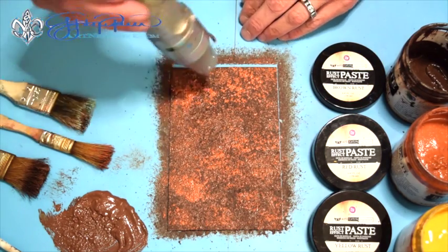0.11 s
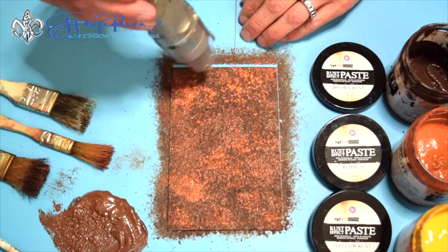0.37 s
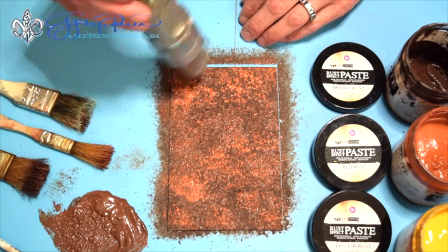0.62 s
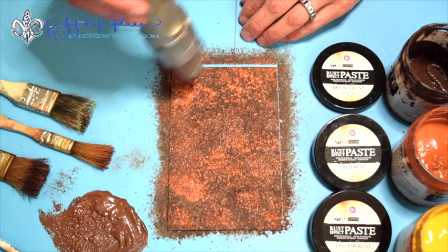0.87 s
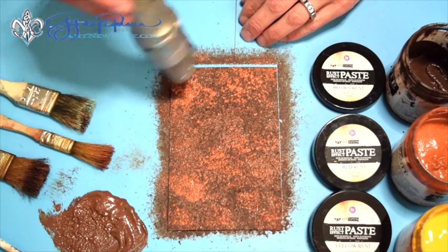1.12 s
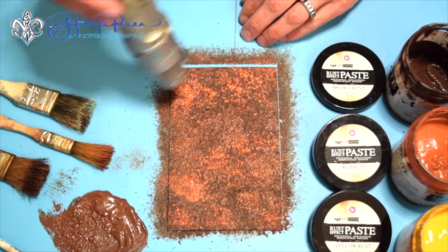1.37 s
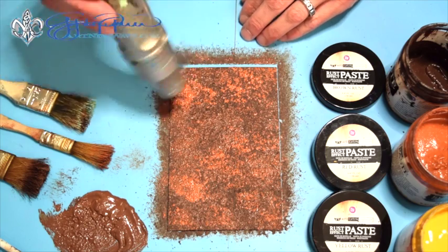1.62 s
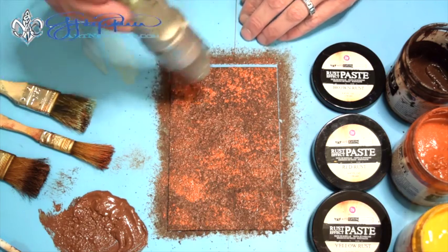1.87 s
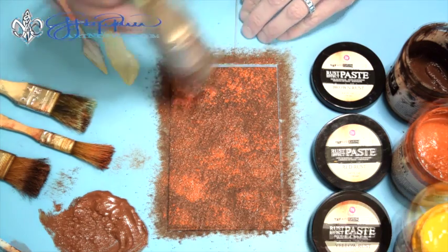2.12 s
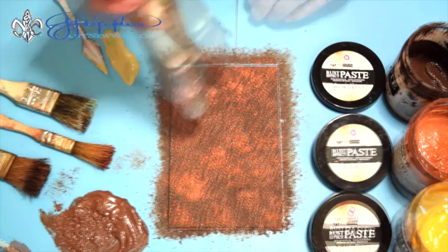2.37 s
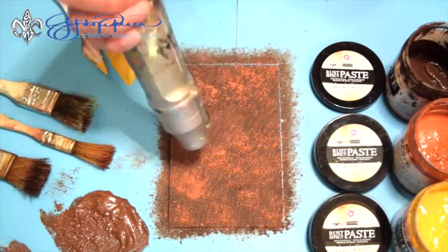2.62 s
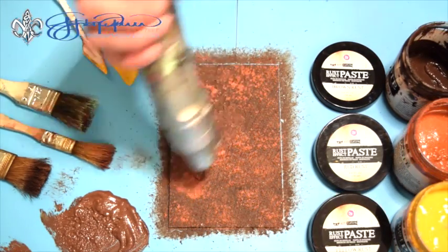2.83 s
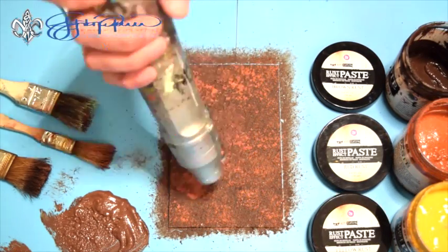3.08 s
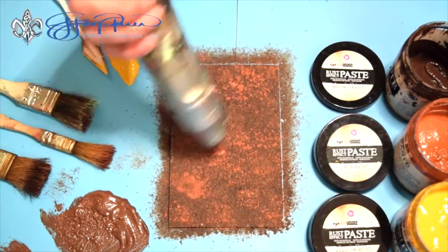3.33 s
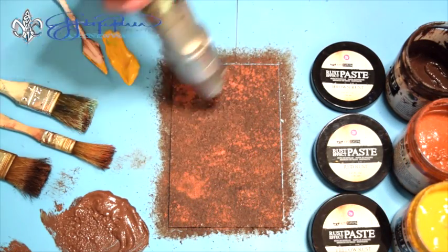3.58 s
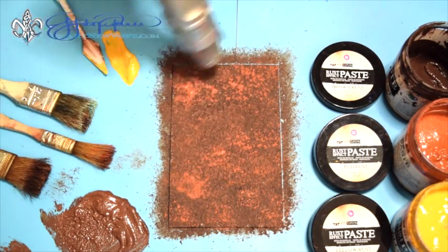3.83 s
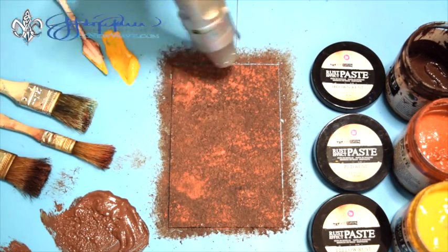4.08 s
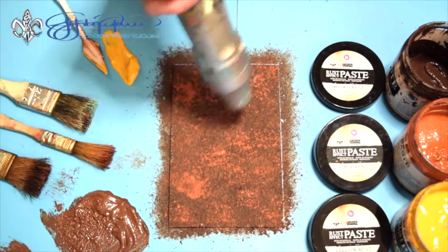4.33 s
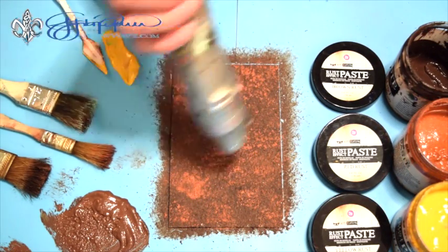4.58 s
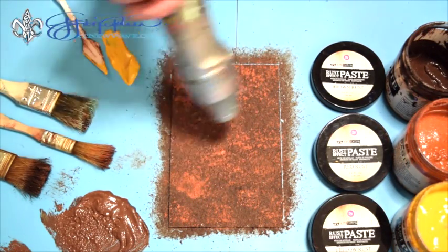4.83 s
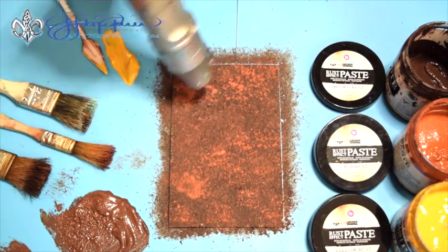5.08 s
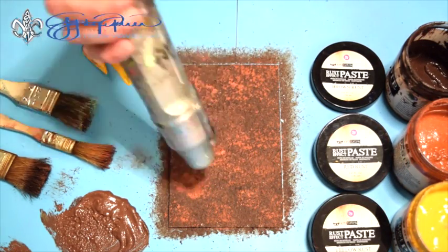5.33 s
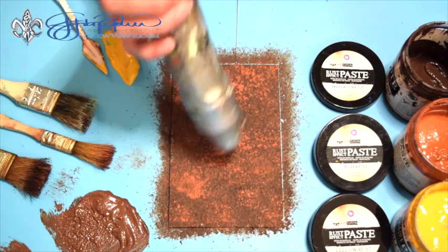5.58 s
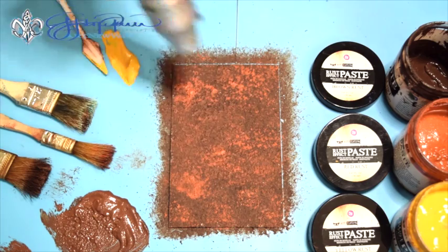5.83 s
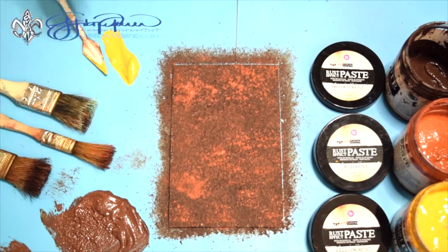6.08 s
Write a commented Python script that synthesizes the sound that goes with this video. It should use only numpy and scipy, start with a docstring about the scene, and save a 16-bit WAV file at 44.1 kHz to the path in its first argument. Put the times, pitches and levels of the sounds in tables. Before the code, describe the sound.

A small heat gun whines and rushes steadily over a table in a quiet room, then clicks off and its fan quickly winds down.

```python
"""Small heat gun over a table

A small heat gun is waved over a table in a quiet room; two stretches of work dissolve into each other.
Motor: throbbing sines on multiples of shaft speed. Fan and nozzle: coloured noise partly recurring each turn.
Switch: clicks ring the plastic grip, the lines die and the fan coasts down.
Room: faint noise and mains throughout, and a low hum that comes in with the second stretch."""
import sys
import numpy as np
from scipy import signal
from scipy.fft import rfft, irfft
from scipy.io import wavfile
from scipy.ndimage import map_coordinates

SR = 44100
rng = np.random.default_rng(int(sys.argv[2]) if len(sys.argv) > 2 else 0)


def invert_db(x):
    """Field ratio 10**(x/20) for x, a level in decibels (scalar or array-like)."""
    u = np.asarray(x, float) / 20
    return 10 ** u


def int16_out(signal):
    """Quantize to a 16-bit WAV file."""
    q = np.round(np.clip(np.atleast_2d(signal).T, -1, 1) * 32767)
    wavfile.write(sys.argv[1], SR, q.astype(np.int16))


N = 272758

# shaft speed in each stretch: (time [s], speed [turns/s])
SHAFT_SPEED = [
    [(0, 218.95), (1.2, 216.3), (2.6, 214.0)],
    [(1.9, 218.9), (3.9, 215.85), (5.76, 213.3), (5.8, 200), (6.18, 120)],
]
# motor lines in each stretch: (multiple of shaft speed, rms level [dB], change at full tilt [dB],
# throb depth before hand share [0-1], throb peak [throb cycles])
MOTOR_LINES_FIRST = [(5, -52.5, -3, 0.4, 0.6), (6, -43.5, 1, 0.9, 0.98), (6.5, -48, 0.5, 0.7, 0.065),
                     (7, -34.5, 0.5, 0.12, 0.056), (7.5, -41.5, -3.5, 0.6, 0.99), (8, -37, 2.5, 0.94, 0.52),
                     (9, -32.5, 0, 0.7, 0.1), (10, -42, 2, 1, 0.34), (11, -43.5, 4.5, 0.4, 0.76),
                     (12, -51.5, -1, 0.9, 0.77), (13, -55, 0, 0.98, 0.73), (21, -59, 1.5, 0.4, 0.53)]
MOTOR_LINES_SECOND = [(4, -51, -1, 0.17, 0.75), (5, -42.5, -10, 0.61, 0.97), (6, -37, 1, 0.82, 0.99),
                      (7, -41, 4, 0.32, 0.28), (7.5, -48.5, -6.5, 0.4, 0.5), (8, -51, 1, 0.95, 0.5),
                      (9, -48.5, 3, 0.59, 0.63), (10, -48, 2, 0.61, 0.01), (11, -48.5, -2.5, 0.2, 0.13),
                      (12, -49.5, -11.5, 0.45, 0.67), (13, -61, -4.5, 0.3, 0.53), (16, -60, -4, 0.37, 0.48),
                      (17, -62, 3, 0.5, 0.73), (18, -61, 11.5, 0.97, 0.86), (21, -58.5, 4.5, 0.35, 0.46)]
# colour of the rush in each stretch, relative: (frequency [Hz], density [dB per Hz])
RUSH_COLOUR_FIRST = [(35, -75.5), (60, -59.5), (260, -26.5), (324, -29), (381, -21), (642, -10.5),
                     (1170, -12), (1490, -1), (1620, -4.5), (1830, -8), (1980, -2), (2780, -17.5),
                     (3300, -25), (5190, -28), (6470, -29.5), (7300, -38.5), (9490, -62.5), (16100, -120)]
RUSH_COLOUR_SECOND = [(35, -52), (60, -38.5), (265, -21.5), (318, -23), (466, -10.5), (581, -9), (710, -4),
                      (1150, -8), (1270, -2), (1380, -2), (1490, -1), (2000, -2), (2650, -6), (2900, -15.5),
                      (3300, -18), (5190, -19.5), (7300, -30.5), (9490, -65), (16100, -120)]
# barrel resonances and table-echo dips: (centre [Hz], width [Hz], gain over the rush [dB])
BARREL_AND_TABLE = [(273.5, 38, 13), (375, 27, 13.5), (472.6, 50, 8), (698, 38, 5.5), (1430, 180, 0),
                    (2280, 50, -4), (2760, 50, -4.5), (3240, 87, -4.5), (4090, 350, 5), (5140, 280, 3.5),
                    (5890, 270, -7)]
# driven rush in each stretch: (level at mid stretch before the band gains [dB], change [dB/s],
# treble lift [dB], change of 1.8-3.3 kHz at full tilt [dB])
DRIVEN_RUSH = [(-28.5, 0.24, 6.5, 0.5), (-30, 0.19, 4.5, -1.5)]
# reference time of the driven level in each stretch: (first [s], second [s])
MID_STRETCH_S = (1.1, 4.2)
# fan coasting and gun put away, added to the driven rush:
# (time [s], level [dB], treble lift [dB], level around 3.2 kHz [dB])
FAN_COAST = [(5.76, -0.5, 3, 5.5), (5.79, 0, 4.5, 7), (5.88, -3.5, 4.5, -5), (5.96, -1.5, 2.5, -2),
             (6.03, -6, 1.5, -5.5), (6.08, -10, -3, 0), (6.105, -21, -6, -7), (6.18, -27.5, 2, 0)]
# hand waving the gun in each stretch: (time [s], throbs counted so far, share of throb depth, tilt [0-1])
HAND_WAVING = [
    [(0, -0.575, 0.78, 0), (0.6, 2.08, 1.7, 0.15), (1.5, 6.06, 0.75, 0.93), (2.8, 11.8, 0.9, 0.66)],
    [(2.2, -3.26, 0.21, 0.1), (3.55, 1.81, 0.32, 0), (3.7, 2.46, 0.51, 0.5), (4.46, 6.01, 0.64, 0.94),
     (5.76, 11.95, 0.94, 0.72), (5.9, 12.6, 1, 0), (6.18, 13.9, 1.1, 0)],
]
# multiples that swell and sink on their own in each stretch: (multiple, curve of (time [s], level [dB]))
LINE_SWELLS = [
    [(6, [(0, -2), (1.7, -4.5), (2.0, 3), (2.8, -1)]), (9, [(0, -1), (2.0, 1), (2.2, 0.5), (2.8, -7)]),
     (10, [(0, 2), (1.0, 0), (1.6, -2.5), (2.15, 2), (2.8, -1)])],
    [(6, [(2.2, -6), (2.75, -6), (3.1, 2), (3.4, 1.5), (3.6, -5.5), (4.25, -2), (4.6, 1), (5.3, -1.5),
     (5.76, -6.5)]), (7, [(2.2, 0), (3.1, -1.5), (3.2, -9), (3.3, -2), (3.87, 3.5), (4.0, -11.5), (4.1, 0),
     (4.97, 1.5), (5.07, -10.5), (5.17, 0), (5.76, -5)])],
]
# colour of the room tone, relative: (frequency [Hz], density [dB per Hz])
ROOM_COLOUR = [(35, -31), (60, -19.5), (119, -13.5), (161, -14), (185, -14), (400, -13), (495, -5.5),
               (600, -10), (1300, -8.5), (3080, -18.5), (7300, -27), (9490, -58.5), (16100, -120)]
# narrow hum in the room tone: (centre [Hz], width [Hz], gain [dB])
ROOM_NARROW_HUM = [(497, 36, 10)]
# low hum before its waver: (time [s], rms level [dB])
LOW_HUM = [(2.5, -95), (2.68, -68.5), (3.3, -70), (3.52, -77), (3.75, -69), (4.8, -65.5), (6.18, -68)]
# switch contacts: (time [s], click height [dB])
SWITCH_CLICKS = [(5.7591, -20), (5.7598, -19), (5.7604, -4.5), (5.7622, -17), (5.7643, -20), (5.7654, -15),
                 (6.078, -38)]
# plastic grip rings: (frequency [Hz], level re click [dB], t60 [s])
GRIP_RINGS = [(2030, -3, .012), (2250, -9, .008), (2650, -10, .008), (3050, -9, .008), (3400, -4, .009),
              (3800, -6, .009), (4300, -15, .006), (5200, -12, .007), (5800, -15, .006), (6400, -10, .008),
              (7050, -17, .006)]

SNAP_S, LINES_DIE_DB_PER_S = 5.7602, 300
LOWER_TWIN_SHARE = .35   # part of the throb from the twin below the line
FLUTTER_DB, FLUTTER_CORNER_HZ = 3.5, 12   # tenth to thirteenth multiples
BODY_LOSS_DB_PER_S, BODY_LOSS_MAX_DB = 66, 15   # 350-900 Hz thins once the drive stops
ECHO_CHANGE_S = .3
ROOM_DB, HUM_PITCH_HZ, MAINS_HZ, MAINS_DB = -53, 105.5, 60, -82.5
CRACK_DB, CRACK_T60_S = -16, .005   # dry crack re click
FADE_OUT_START_S, FADE_OUT_END_S = 1.99, 2.8
FADE_IN_START_S, FADE_IN_END_S = 2.19, 2.67
RIGHT_OVER_LEFT_DB, UNLIKE_RUSH_DB = 0.92, -27
SIDE_ECHO_S, SIDE_ECHO_DB = .003, -27.5   # lines reach the two ports unequally by way of the table


def rms_one(x):
    """Scale to rms 1."""
    return x / np.sqrt(np.mean(x ** 2) + 1e-20)


def in_time(rows):
    """Columns of a curve table, one value a sample."""
    s, *columns = np.transpose(rows)
    return [np.interp(np.arange(N) / SR, s, c) for c in columns]


def drift(corner_hz):
    """Slow random curve of spread 1: noise through two equal poles, computed every 40 samples."""
    pole = np.exp(-80 * np.pi * corner_hz / SR)
    noise = rng.standard_normal(N // 40 + 2002)
    slow = signal.lfilter([1], [1, -2 * pole, pole * pole], noise)[2000:]   # settled part
    return np.interp(np.arange(N) / 40, np.arange(len(slow)), rms_one(slow))


def high_pass(x, edge_hz, order):
    """Butterworth low cut."""
    return signal.sosfilt(signal.butter(order, edge_hz, "high", fs=SR, output="sos"), x)


def band_pass(x, low_hz, high_hz):
    """Butterworth band."""
    return signal.sosfilt(signal.butter(1, [low_hz, high_hz], "band", fs=SR, output="sos"), x)


def coloured(source, points, hollows=()):
    """Shape the spectrum by a drawn curve with resonant humps and dips; rms 1."""
    hz = np.fft.rfftfreq(N, 1 / SR) + 1
    points_hz, points_db = np.transpose(points)
    level_db = np.interp(np.log(hz), np.log(points_hz), points_db)
    for centre_hz, width_hz, hump_db in hollows:
        level_db = level_db + hump_db / (1 + (2 * (hz - centre_hz) / width_hz) ** 2)
    return rms_one(irfft(rfft(source) * invert_db(level_db), N))


def echoes(x, t60_s, wet_db):
    """Add a short room tail, thin in the bass; its pattern dissolves into a new one as the gun moves."""
    t = np.arange(SR // 4) / SR
    out = np.zeros(N + SR * 2)
    hop = int(ECHO_CHANGE_S * SR)
    padded = np.concatenate([np.zeros(hop), x, np.zeros(2 * hop)])
    window = np.sin(np.pi * np.arange(2 * hop) / (2 * hop))
    tails = signal.lfilter([.5], [1, -.5], rng.standard_normal((30, len(t))))
    tails = tails * invert_db(-60 * t / t60_s) * (t > .004)
    for k, i in enumerate(range(0, N + hop, hop)):
        tail = tails[k % 30]
        tail = high_pass(tail / np.sqrt(np.sum(tail ** 2)), 1000, order=2)
        wet = signal.fftconvolve(padded[i:i + 2 * hop] * window, tail)[:len(out) - i]
        out[i:i + len(wet)] += wet
    return x + invert_db(wet_db) * out[hop:hop + N]


def motor(speed, lines, waving, swells, waver_db, wobble_rad):
    """Each shaft multiple beats against weaker twins a few hertz away, wavering in level and phase."""
    t = np.arange(N) / SR
    angle = 2 * np.pi * np.cumsum(in_time(speed)[0]) / SR
    throbs, share, tilt = in_time(waving)
    out = 0
    for multiple, level_db, tilt_db, full_depth, peak in lines:
        depth = np.clip(full_depth * share, 0, 1)
        upper, lower = depth * (1 - LOWER_TWIN_SHARE), depth * LOWER_TWIN_SHARE
        turn = np.exp(2j * np.pi * (throbs - peak))
        beat = 1 + upper * turn + lower / turn
        unit_rms = np.sqrt(2 / (1 + upper ** 2 + lower ** 2))
        gain = invert_db(level_db + tilt_db * tilt + waver_db * drift(14)) * unit_rms
        for which, rows in swells:
            if which == multiple:
                gain = gain * invert_db(in_time(rows)[0])
        if 10 <= multiple <= 13:
            gain = gain * invert_db(FLUTTER_DB * drift(FLUTTER_CORNER_HZ))
        phase = multiple * angle + rng.uniform(0, 2 * np.pi) + wobble_rad * drift(6.0)
        out = out + gain * np.real(beat * np.exp(1j * phase))
    return out * invert_db(-LINES_DIE_DB_PER_S * np.maximum(t - SNAP_S, 0))


def repeating(turns, memory, count):
    """Noise along the shaft angle, partly recurring after count turns: soft lines in the spectrum."""
    steps = 90 * count   # 90 points a turn
    fresh = rng.standard_normal((int(1500 / count), steps))
    kept = signal.lfilter([1], [1, -memory], fresh, axis=0).ravel()
    return rms_one(map_coordinates(kept, [turns * 90 + 30 * steps], order=3))


def rush(colour, speed, waving, driven, middle_s, one_turn_db, two_turns_db, throb_db, throb_peak):
    """Turbulent air: the blades meet like eddies one and two turns later; treble may throb with the motor."""
    t = np.arange(N) / SR
    coast_db, coast_treble_db, coast_gap_db = in_time(FAN_COAST)
    level_db, change_db_per_s, treble_db, tilted_db = driven
    throbs, _, tilt = in_time(waving)
    turns = np.cumsum(in_time(speed)[0]) / SR
    one_turn = high_pass(repeating(turns, .82, count=1), 2700, order=4)
    two_turns = repeating(turns, 0.38, count=2)
    two_turns = two_turns - high_pass(two_turns, 2500, order=1)   # keeps the lows
    eddies = repeating(turns, 0, count=1) + invert_db(one_turn_db) * one_turn + invert_db(two_turns_db) * two_turns
    air = rms_one(echoes(coloured(eddies, colour, BARREL_AND_TABLE), t60_s=.13, wet_db=-4))

    treble_db = treble_db + coast_treble_db + throb_db * np.cos(2 * np.pi * (throbs - throb_peak))
    air = air + (invert_db(treble_db) - 1) * high_pass(air, 4010, order=2)
    air = air + (invert_db(coast_gap_db) - 1) * band_pass(air, 2750, 3750)
    air = air + (invert_db(tilted_db * tilt) - 1) * band_pass(air, 1800, 3300)
    body_db = -np.clip(BODY_LOSS_DB_PER_S * (t - SNAP_S), 0, BODY_LOSS_MAX_DB)
    air = air + (invert_db(body_db) - 1) * band_pass(air, 350, 900)
    return air * invert_db(level_db + change_db_per_s * (t - middle_s) + coast_db + .6 * drift(5))


def room_tone():
    """Faint broad noise, a mains sine and a low hum wavering in pitch and level."""
    t = np.arange(N) / SR
    noise = invert_db(ROOM_DB) * coloured(rng.standard_normal(N), ROOM_COLOUR, ROOM_NARROW_HUM)
    phase = 2 * np.pi * HUM_PITCH_HZ * t + 0.6 * drift(5.2)
    hum = invert_db(in_time(LOW_HUM)[0] + 1.2 * drift(5)) * np.sin(phase)
    mains = invert_db(MAINS_DB + 1.5 * drift(3)) * np.sin(2 * np.pi * MAINS_HZ * t)
    return noise + np.sqrt(2) * (hum + mains)   # sine levels as rms


def ring(clicks, hz, t60_s):
    """Two-pole resonator: a unit click starts a decaying sine of height 1."""
    r, w = invert_db(-60 / (t60_s * SR)), 2 * np.pi * hz / SR
    return signal.lfilter([0, np.sin(w)], [1, -2 * r * np.cos(w), r * r], clicks + 1e-18)


def switch():
    """Press, snap, rebounds and release ring the grip's modes, each with a dry noise crack."""
    clicks = np.zeros(N)
    for s, height_db in SWITCH_CLICKS:
        clicks[round(s * SR)] = invert_db(height_db)
    rings = 0
    for k, (hz, level_db, t60_s) in enumerate(GRIP_RINGS):
        rings = rings + (-1) ** k * invert_db(level_db) * ring(clicks, hz, t60_s)
    crack_s = np.arange(400) / SR
    crack = rng.standard_normal(400) * invert_db(CRACK_DB - 60 * crack_s / CRACK_T60_S)
    return high_pass(rings + np.convolve(clicks, crack)[:N], 1500, order=2)


def scene():
    """The first stretch fades out as the second fades in; nearly the same sound at both ports."""
    leaving, = in_time([(FADE_OUT_START_S, 1), (FADE_OUT_END_S, 0)])
    coming, = in_time([(FADE_IN_START_S, 0), (FADE_IN_END_S, 1)])
    first = motor(SHAFT_SPEED[0], MOTOR_LINES_FIRST, HAND_WAVING[0], LINE_SWELLS[0],
                  waver_db=.7, wobble_rad=.2)
    second = motor(SHAFT_SPEED[1], MOTOR_LINES_SECOND, HAND_WAVING[1], LINE_SWELLS[1],
                   waver_db=.9, wobble_rad=.2)
    lines = leaving * first + coming * second

    airs = []
    for _ in range(2):   # shared rush, then the unlike part
        first = rush(RUSH_COLOUR_FIRST, SHAFT_SPEED[0], HAND_WAVING[0], DRIVEN_RUSH[0], MID_STRETCH_S[0],
                     one_turn_db=-2.5, two_turns_db=1.5, throb_db=0.1, throb_peak=0.35)
        second = rush(RUSH_COLOUR_SECOND, SHAFT_SPEED[1], HAND_WAVING[1], DRIVEN_RUSH[1], MID_STRETCH_S[1],
                      one_turn_db=-8.0, two_turns_db=-1.5, throb_db=0.0, throb_peak=1.0)
        airs.append(leaving * first + coming * second)
    shared_air, unlike_air = airs

    mid = lines + shared_air + room_tone() + echoes(switch(), t60_s=0.2, wet_db=-10.5)
    late_lines = np.interp(np.arange(N) - SIDE_ECHO_S * SR, np.arange(N), lines)
    side = invert_db(UNLIKE_RUSH_DB) * unlike_air + invert_db(SIDE_ECHO_DB) * late_lines
    left = mid * invert_db(-RIGHT_OVER_LEFT_DB / 2) + side
    right = mid * invert_db(RIGHT_OVER_LEFT_DB / 2) - side
    return np.array([left, right])


def band_limit(x):
    """A steep low-pass at the top of the band."""
    return signal.sosfilt(signal.butter(12, 7750, fs=SR, output="sos"), x)


def record(dry):
    """A small microphone without deep bass, then a steep elliptic low pass."""
    thin = high_pass(dry, 100, order=2)
    low_pass = signal.ellip(12, .5, 60, 7380, fs=SR, output="sos")   # ripple dB, stop dB, edge Hz
    mix = signal.sosfilt(low_pass, thin)
    return band_limit(mix)


dry = scene()
out = record(dry)
int16_out(out)
```